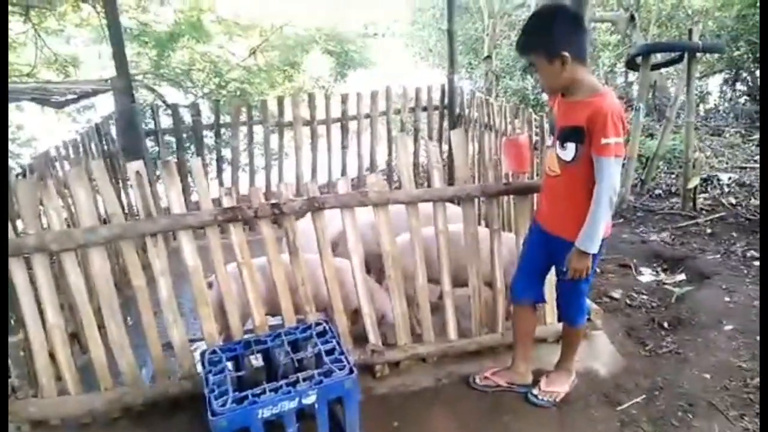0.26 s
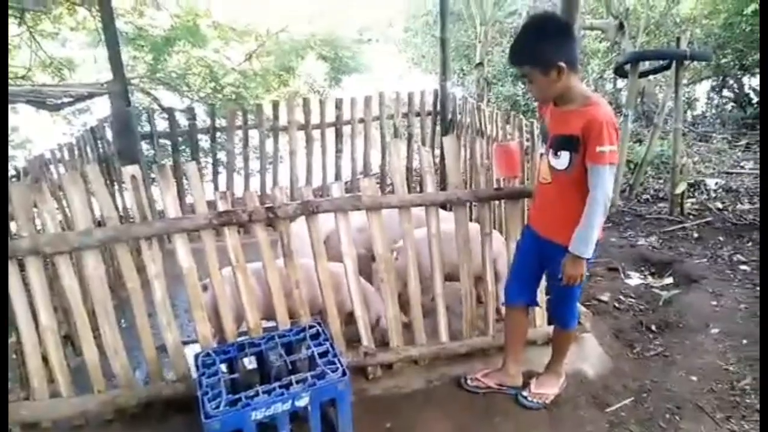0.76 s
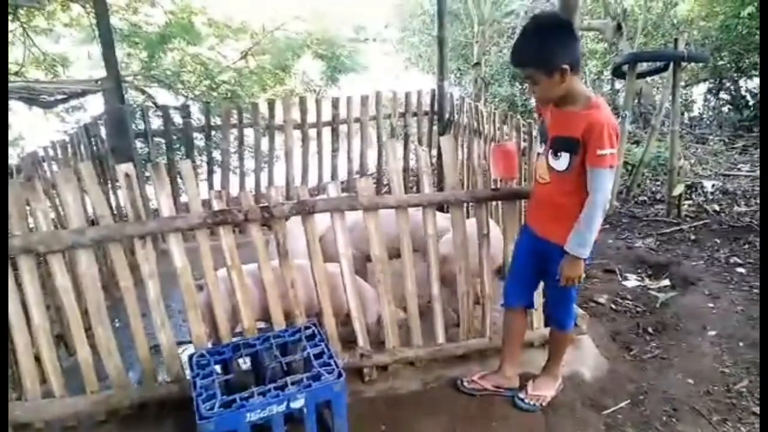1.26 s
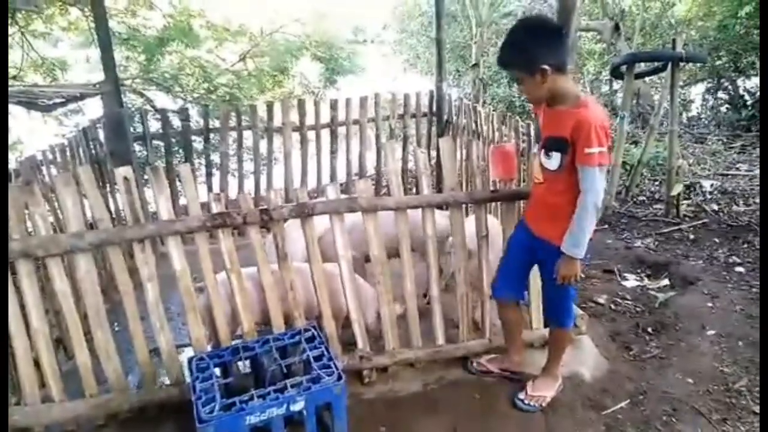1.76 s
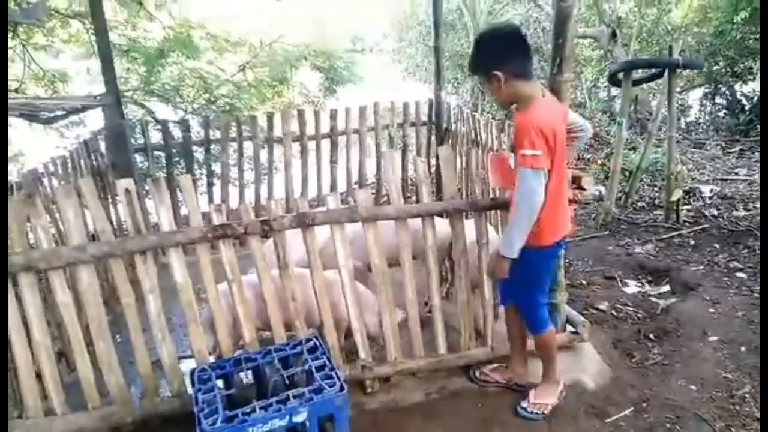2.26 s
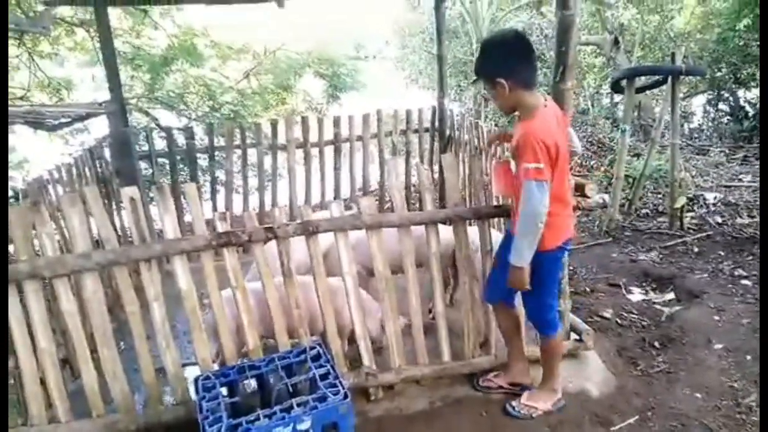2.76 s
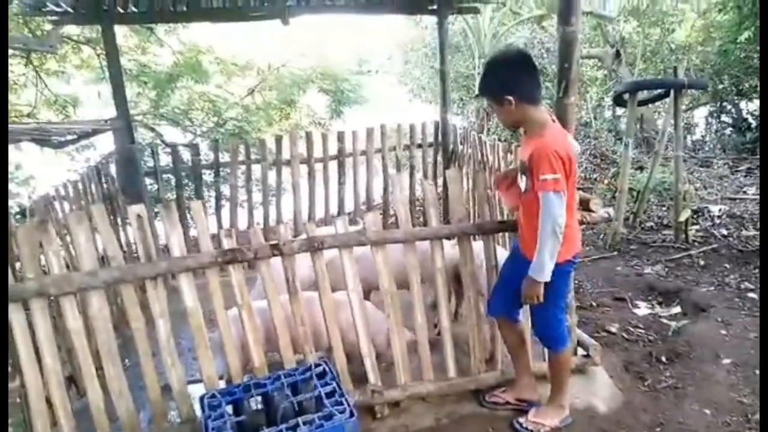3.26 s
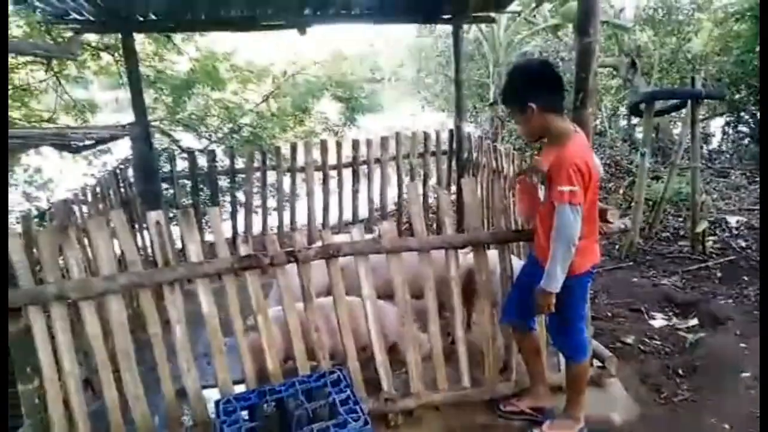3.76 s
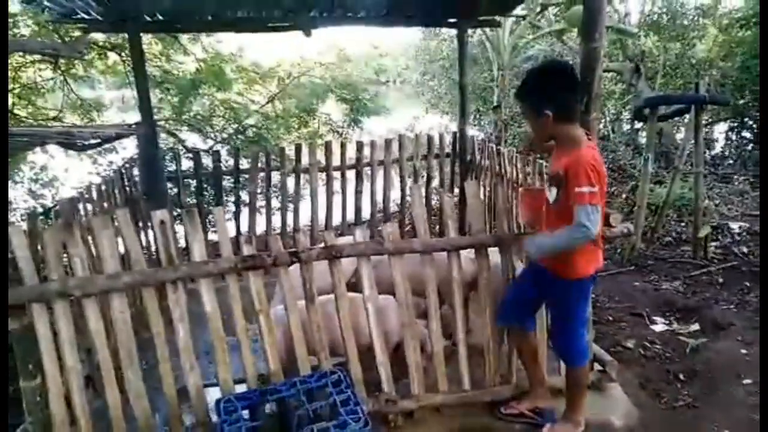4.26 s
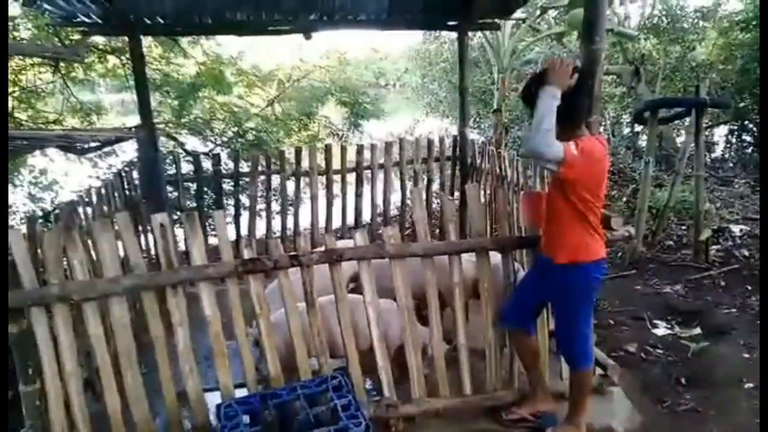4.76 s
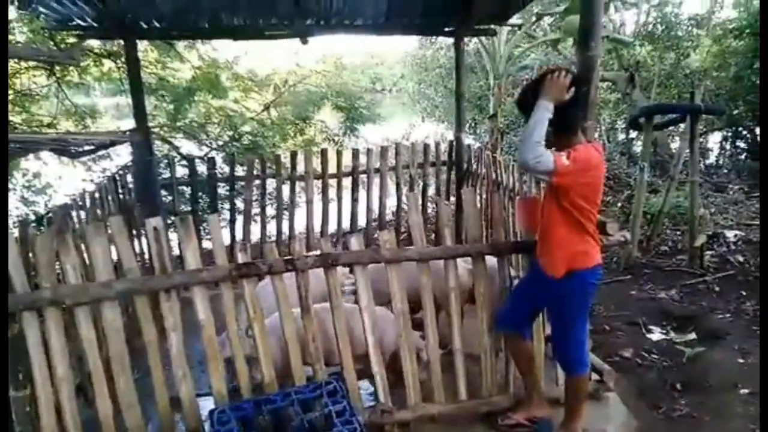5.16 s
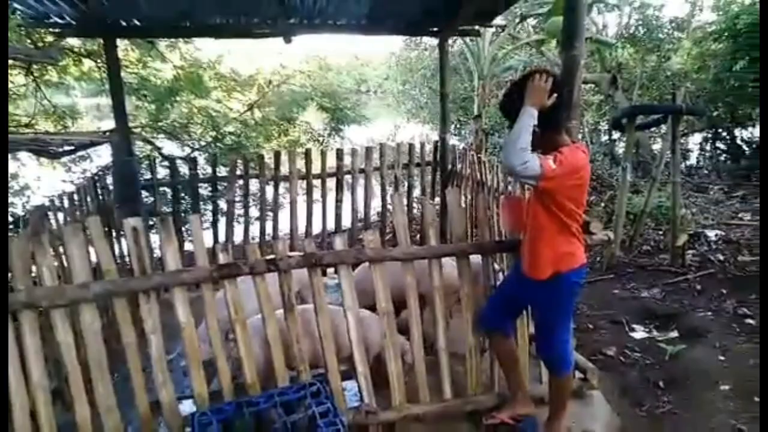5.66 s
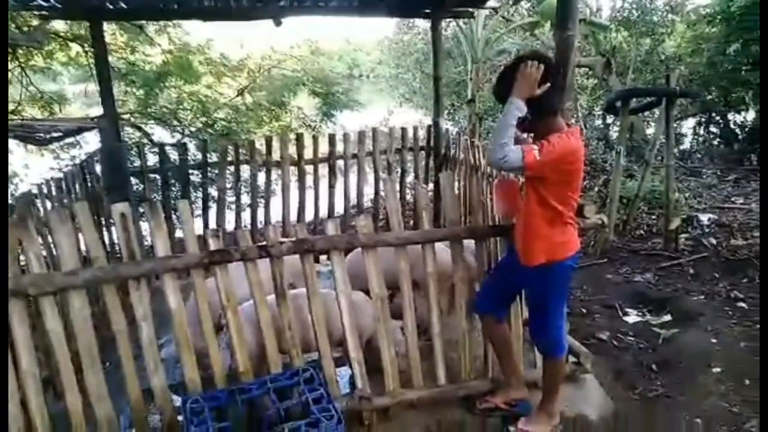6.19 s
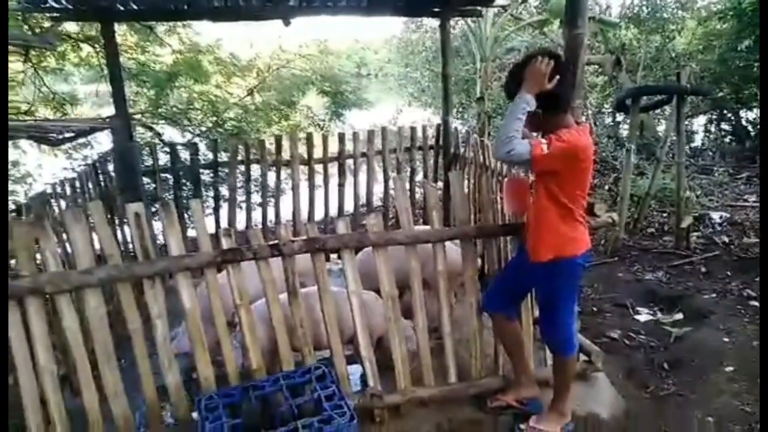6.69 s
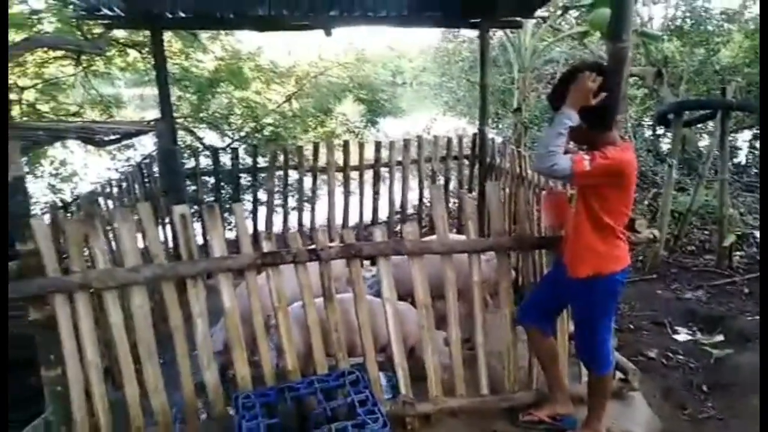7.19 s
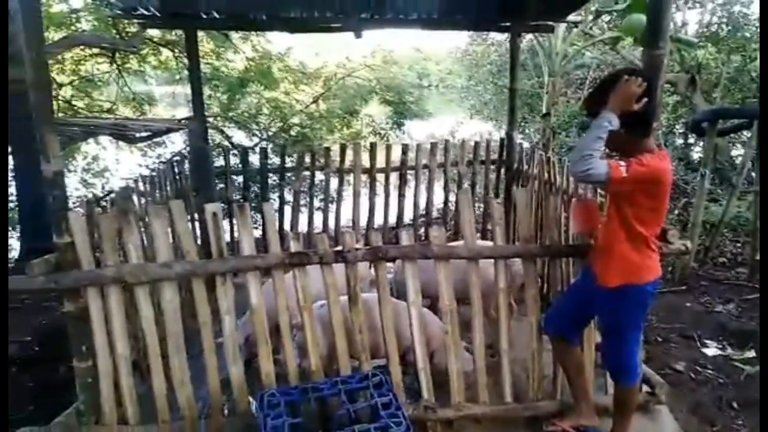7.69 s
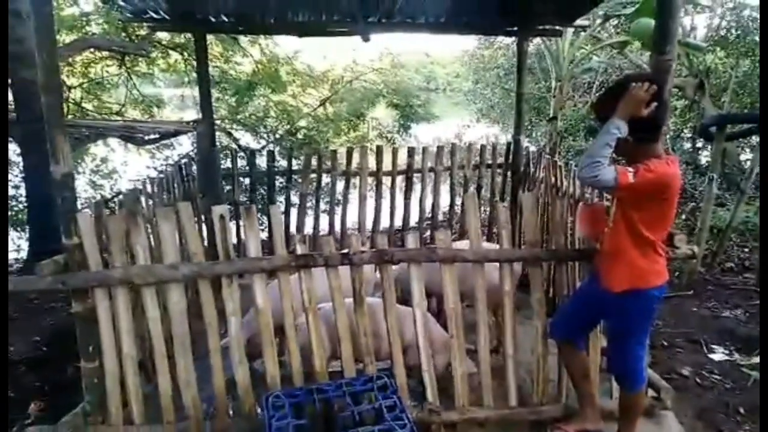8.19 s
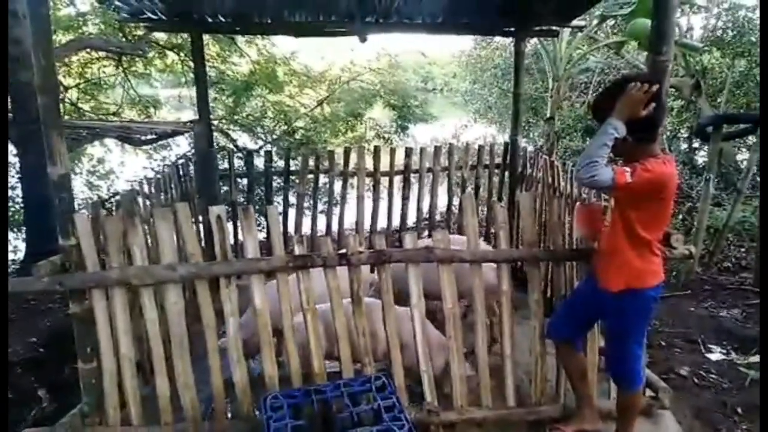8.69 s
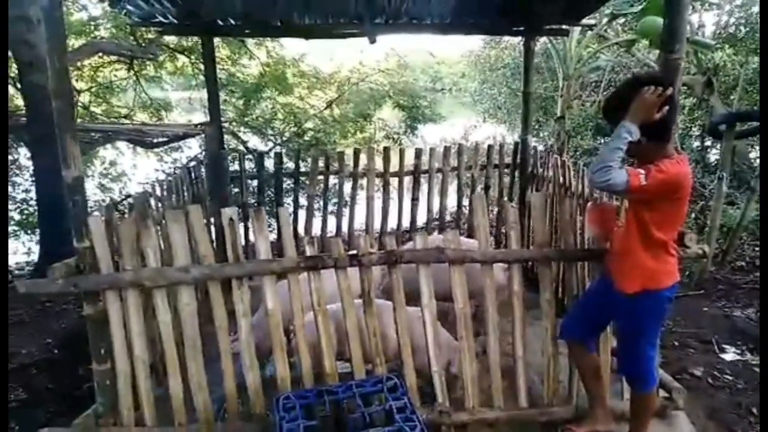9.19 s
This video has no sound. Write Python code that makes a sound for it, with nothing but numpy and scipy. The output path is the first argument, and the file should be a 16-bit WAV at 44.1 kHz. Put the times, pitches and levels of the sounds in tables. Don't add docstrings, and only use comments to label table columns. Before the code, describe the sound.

Pigs snuffle, grunt and smack wetly in a slatted pen while a chick peeps sharply, a rooster crows early and a songbird whistles beyond.

```python
import sys
import numpy as np
from scipy import signal
from scipy.io import wavfile
from scipy.ndimage import uniform_filter1d, map_coordinates

SR = 44100
rng = np.random.default_rng(int(sys.argv[2]) if len(sys.argv) > 2 else 0)


def to_wav(sig):
    pcm = np.clip(np.atleast_2d(sig), -1, 1) * 32767
    pcm = np.round(pcm).astype(np.int16)
    wavfile.write(sys.argv[1], SR, pcm.T)


def nominal_scale(level):
    x = np.asarray(level, float) / 20
    return 10 ** x


N = 416304


def evened(x):
    return x / np.sqrt(np.mean(x ** 2) + 1e-20)


def read(points, hz):
    f, value = np.transpose(points)
    return np.interp(np.log(hz + 1), np.log(f + 1), value)


def columns(rows):
    s, *rest = np.transpose(rows)
    t = np.arange(s[0], s[-1], 1 / SR)
    return s[0], [np.interp(t, s, column) for column in rest]


def add(mix, s, sound):
    part = mix[round(s * SR):][:len(sound)]
    part += sound[:len(part)]


def phase(hz):
    return 2 * np.pi * np.cumsum(hz) / SR


def resonate(x, hz, width_hz):
    turn = np.exp(1j * phase(hz * np.ones(len(x))))
    r = np.exp(-np.pi * width_hz / SR)
    return 2 * (turn * signal.lfilter([1 - r], [1, -r], x / turn)).real


def resonate_twice(x, hz, width_hz):
    return resonate(resonate(x, hz, width_hz), hz, width_hz)


def wander(size, rate_hz):
    span = max(round(SR / rate_hz / 2), 1)
    return evened(uniform_filter1d(uniform_filter1d(rng.standard_normal(size), span), span))


def noise(shape_db, same, patch_db, size=512):
    hz = np.fft.rfftfreq(size, 1 / SR)[:, None]
    s = np.arange(4 * N // size + 5) * size / 4 / SR
    a, b, c, d, patches = rng.standard_normal((len(s), len(hz), 5)).T
    patches = evened(uniform_filter1d(uniform_filter1d(patches, 2, 0), 28, 1))
    left, other = a + 1j * b, c + 1j * d
    z = np.array([left, same * left + np.sqrt(1 - same ** 2) * other])
    z *= nominal_scale(shape_db(hz, s) + patch_db * patches)
    return signal.istft(z, nperseg=size, noverlap=size * 3 // 4)[1][:, :N] / np.sqrt(size / 3)


def place(x, left_lag_ms, wet_db, first_ms):
    # f/Hz, t60/s
    shed = [(300, 0.71), (1500, 0.34), (4000, 0.3), (10000, 0.18)]
    shift = left_lag_ms * SR / 1000 * np.array([[-1], [0]])
    direct = map_coordinates(x, (np.arange(N) + shift)[None], order=0)

    taps = np.zeros((2, SR // 2))
    slots = np.arange(round(first_ms * SR / 1000), SR // 2 - 60, 60)
    at = slots + rng.integers(0, 60, (2, len(slots)))
    np.put_along_axis(taps, at, rng.choice([-1., 1.], at.shape), 1)
    f, t, z = signal.stft(taps, SR, nperseg=256)
    tail = signal.istft(z * nominal_scale(-60 * t / read(shed, f)[:, None]), SR, nperseg=256)[1]
    tail /= np.linalg.norm(tail[0])
    return direct + nominal_scale(wet_db) * signal.fftconvolve(x[None], tail, axes=1)[:, :N]


def road():
    # f/Hz, level/dB per Hz
    rumble_colour = [(12, -32), (20, -15.5), (32, -42.5), (97, 8), (233, -10.5), (304, -22), (398, -24),
                     (468, -76), (586, -34), (700, -40), (910, -100), (1540, -120)]
    # t/s, level/dB
    rumble_level = [(0.0, -44.5), (2.18, -46), (8.28, -44.5), (9.44, -46.5)]
    # t/s, firing rate/Hz, level/dB
    engine_pass = [(5.5, 40.9, -131), (5.95, 40.7, -67), (6.5, 40.95, -60.5), (7.0, 40.63, -65.5),
                   (7.4, 40.67, -74), (7.8, 42.5, -81)]
    # multiple of the firing rate, level/dB
    engine_orders = [(3, -22.5), (4, 7), (5, 7), (6, -8), (7, 0.5), (8, 1), (9, 1), (10, -7), (11, -10.5)]
    s, level_db = np.transpose(rumble_level)
    rumble = evened(noise(lambda hz, t: read(rumble_colour, hz) + 0 * t, same=0.97, patch_db=1.07, size=2048))
    rumble *= nominal_scale(np.interp(np.arange(N) / SR, s, level_db))

    start, (hz, db) = columns(engine_pass)
    turn = phase(hz * (1 + 0.0042 * wander(len(hz), 3.3)))
    hum = 0
    for k, order_db in engine_orders:
        hum = hum + nominal_scale(order_db + 3.6 * wander(len(hz), 14)) * np.sin(k * turn + 6 * rng.random())
    engine = np.zeros(N)
    add(engine, start, nominal_scale(db) * hum)
    return rumble + engine


def leaves_and_insects():
    # f/Hz, level/dB per Hz
    hiss_colour = [(30, -21), (240, 18.5), (400, 2.5), (492, -3.5), (1440, -9.5), (2880, -14), (3430, 3),
                   (5580, -9), (6760, 4.5), (7830, -31.5), (13500, -47)]
    hiss = noise(lambda hz, t: read(hiss_colour, hz) + 0 * t, same=0.014, patch_db=7.5, size=1024)
    return nominal_scale(-60) * evened(hiss)


def whistles(rows, waver, flutter_db, flutter_hz):
    out = np.zeros(N)
    for start, end, from_hz, to_hz, db in rows:
        size = round((end - start) * SR)
        hz = np.linspace(from_hz, to_hz, size) * (1 + waver * wander(size, 170))
        level = nominal_scale(db + flutter_db * wander(size, flutter_hz)) * signal.windows.tukey(size, .35)
        add(out, start, np.sqrt(2) * level * np.sin(phase(hz)))
    return out


def songbird():
    # start t/s, end t/s, first f/Hz, last f/Hz, level/dB
    song = [(3.48, 3.76, 2044, 1979, -59), (2.95, 3.38, 4640, 4460, -63), (3.39, 3.56, 3737, 3773, -56),
            (4.3, 4.5, 4330, 4315, -68), (4.41, 4.79, 4320, 4290, -59.5), (4.97, 5.3, 3960, 3900, -65),
            (5.25, 5.66, 3900, 3870, -60), (3.21, 3.41, 1760, 1730, -70), (4.22, 4.49, 1740, 1660, -68),
            (4.81, 4.98, 1690, 1750, -66), (5.2, 5.62, 1720, 1690, -67), (5.58, 6.2, 3550, 3509, -57.5),
            (7.42, 7.72, 4040, 4000, -65), (7.66, 7.88, 3980, 3910, -61), (7.82, 8.02, 3920, 3890, -69),
            (7.56, 7.8, 5260, 5230, -64), (7.55, 7.8, 5920, 5860, -65)]
    # start t/s, end t/s, first f/Hz, last f/Hz, level/dB
    far_calls = [(4.52, 4.7, 2800, 2600, -69), (5.25, 5.36, 2800, 3200, -65.5),
                 (6.7, 6.86, 2300, 2250, -70), (7.07, 7.22, 5600, 4800, -66.5),
                 (7.44, 7.56, 7500, 6800, -79), (8.9, 9.1, 3200, 3800, -62), (8.02, 8.18, 4080, 3950, -68),
                 (8.17, 8.6, 3560, 3250, -68.5), (8.13, 8.5, 2640, 2400, -67),
                 (8.75, 9.44, 1800, 1860, -69.5), (6.65, 7.0, 3240, 3000, -65),
                 (4.33, 4.52, 2760, 2720, -87.5), (8.02, 8.16, 6100, 6100, -67.5),
                 (7.97, 8.15, 5200, 3500, -80), (6.62, 7.0, 3650, 3200, -69),
                 (6.9, 7.01, 1020, 1000, -75.5)]
    clear = whistles(song, waver=0.0069, flutter_db=2.5, flutter_hz=35)
    return clear + whistles(far_calls, waver=0.0236, flutter_db=5, flutter_hz=90)


def rooster():
    # t/s, f/Hz, effort/dB, hoarseness/0-1
    syllables = [
        [(.38, 628, -55, 0.46), (.47, 698, -52.5, 0.23), (.6, 687, -63, 0.42), (.95, 690, -66, .4)],
        [(.44, 787, -50.5, 0.06), (.55, 774.7, -50.5, 0.22), (.66, 796, -43.5, 0.31), (.78, 781, -57, 0.23)],
        [(.6, 829.4, -50, 0.02), (.7, 834, -47, 0.01), (.8, 856, -52.5, 0.54)],
        [(.83, 813, -38, 0.56), (.9, 819, -51, 0.43), (1.0, 802.6, -46.5, 0.22), (1.2, 807.7, -45.5, 0.55),
         (1.58, 766.6, -66, 0.95)],
        [(1.57, 661.5, -47.5, 0.15), (1.72, 649.6, -51, 0), (1.87, 628.7, -59.5, 0.07),
         (2.15, 580.6, -63.5, 0.7), (2.4, 557, -81.5, 0.4)],
        [(3.45, 1004, -63.5, 0.64), (4.02, 948, -67.5, 1)],
        [(9.0, 577.5, -67.5, 0.6), (9.44, 550, -68, 0.85)],
    ]
    # f/Hz, gain/dB
    crow_throat = [(600, -12), (820, -16.5), (1300, -7.5), (1650, -11), (2050, -16), (2500, -30),
                   (3300, -49)]
    out = np.zeros(N)
    for rows in syllables:
        s, (hz, db, hoarse) = columns(rows)
        size = len(hz)
        turn = phase(hz * (1 + (.003 + .032 * hoarse) * wander(size, 97)))
        stack = sum(nominal_scale(read(crow_throat, k * hz)) * np.sin(k * turn) for k in range(1, 5))
        rattle = np.cos(phase(120 * (1 + 0.261 * wander(size, 39)))) + 0.055 * wander(size, 250)
        swell = nominal_scale(db + 2.5 * wander(size, 45)) * signal.windows.tukey(size, .08)
        add(out, s, np.sqrt(2) * swell * stack * (1 + hoarse * rattle))
    return out


def peeps():
    # t/s, f/Hz, level/dB
    long_notes = [
        [(0.144, 4850, -46), (0.161, 4800, -36), (0.178, 4565, -46.5), (0.195, 3811, -49), (0.211, 3617, -36.5),
         (0.227, 3359, -53), (0.244, 2720, -36.5), (0.261, 2200, -40.5)],
        [(1.006, 4360, -36), (1.025, 4550, -32.5), (1.044, 4290, -41), (1.063, 4120, -42), (1.083, 3476, -31),
         (1.101, 3300, -32), (1.12, 2940, -50.5), (1.139, 2250, -30)],
        [(1.29, 4730, -39), (1.308, 4580, -46), (1.327, 4177, -47), (1.345, 3811, -43), (1.363, 3509, -32.5),
         (1.381, 3186, -36), (1.4, 2734, -44), (1.418, 2176, -33.5)],
        [(2.303, 4570, -73), (2.321, 4026, -30), (2.339, 3790, -34.5), (2.357, 3445, -39), (2.376, 3273, -34.5),
         (2.394, 3143, -46), (2.412, 2876, -37), (2.429, 2740, -45)],
        [(2.508, 4680, -55), (2.528, 4620, -52), (2.547, 4410, -74), (2.567, 3610, -36), (2.586, 3466, -35.5),
         (2.606, 2885, -49), (2.625, 2583, -34), (2.645, 2340, -37)],
        [(3.591, 4888, -50), (3.613, 4737, -49), (3.635, 3983, -47), (3.657, 3805, -39), (3.679, 3470, -46),
         (3.701, 3030, -32.5), (3.723, 2840, -40.5), (3.744, 2570, -41)],
        [(3.872, 4880, -53), (3.891, 4371, -43), (3.91, 4130, -40), (3.929, 3840, -40), (3.948, 3520, -35.5),
         (3.967, 3270, -30), (3.986, 2880, -37), (4.005, 2460, -42)],
        [(4.838, 4608, -39.5), (4.857, 4590, -45.5), (4.876, 4091, -44.5), (4.895, 3746, -38),
         (4.913, 3596, -32.5), (4.932, 3445, -36.5), (4.951, 2971, -45), (4.97, 2420, -31)],
        [(7.292, 4457, -27.5), (7.306, 4198, -52), (7.32, 3710, -33), (7.334, 3623, -43.5), (7.347, 3390, -42),
         (7.361, 2970, -48), (7.375, 2710, -56), (7.389, 2450, -39)],
        [(7.478, 4610, -44), (7.491, 4478, -48), (7.504, 4134, -40), (7.517, 3983, -42), (7.531, 3580, -30.5),
         (7.544, 3390, -43), (7.557, 3130, -40.5), (7.57, 2800, -57)],]
    # start t/s, length t/s, first f/Hz, last f/Hz, level/dB
    short_notes = [(0.031, 0.028, 2880, 2656, -38), (0.403, 0.052, 4020, 3620, -50),
                   (0.449, 0.053, 3580, 2900, -55.5), (0.602, 0.061, 4260, 3870, -55.5),
                   (0.649, 0.059, 3740, 3090, -49.5), (0.786, .062, 4336, 3375, -48.5),
                   (0.993, 0.015, 3400, 3520, -39), (1.163, 0.055, 4260, 3360, -49),
                   (1.676, 0.029, 3600, 2740, -47), (2.304, .018, 4750, 4380, -52),
                   (2.51, 0.053, 4740, 4380, -50), (1.65, 0.025, 3900, 3920, -43.5),
                   (2.288, 0.012, 3790, 4640, -53), (3.519, 0.071, 2930, 2490, -52.5),
                   (4.825, 0.015, 2960, 4350, -45), (6.276, 0.033, 2880, 2090, -39),
                   (6.319, 0.022, 2200, 3610, -41), (6.466, 0.035, 3710, 2520, -35.5),
                   (7.265, 0.013, 2880, 4000, -47.5), (7.46, .01, 3500, 4100, -42),
                   (8.81, 0.077, 4310, 3805, -54)]
    short = [[(s, from_hz, db), (s + length, to_hz, db)] for s, length, from_hz, to_hz, db in short_notes]
    out = np.zeros(N)
    for rows in long_notes + short:
        s, (hz, db) = columns(rows)
        turn = phase(hz * (1 + .012 * wander(len(hz), 130)))
        level = nominal_scale(db + 2.2 * wander(len(hz), 150)) * signal.windows.tukey(len(hz), .1)
        add(out, s, level * (np.sin(turn) + nominal_scale(-33) * np.sin(2 * turn)))
    return out


def snaps():
    # t/s, peak level/dB, centre f/Hz
    snap_hits = [
        (1.8255, -33, 4800),
        (2.1262, -37, 2300),
        (2.1263, -41, 6000),
        (2.2203, -32, 7500),
        (2.682, -40, 5000),
        (3.81, -42, 7000),
        (5.7325, -33, 4500),
    ]
    out, click = np.zeros(N), signal.unit_impulse(441)
    for s, db, hz in snap_hits:
        ring = resonate_twice(click, hz, 2500)
        add(out, s, nominal_scale(db) * ring / abs(ring).max())
    return out


def knocks():
    # t/s, peak level/dB, ring f/Hz, t60/s
    trough_hits = [
        (2.6812, -40.5, 1254, 0.016),
        (6.234, -48.5, 1293, 0.31),
        (7.285, -53, 1090, 0.092),
        (8.241, -46, 1490, 0.11),
        (8.562, -41, 1580, 0.11),
        (9.3068, -35.5, 1300, 0.033),
    ]
    out, t = np.zeros(N), np.arange(8820) / SR
    for s, db, hz, t60 in trough_hits:
        blow = rng.standard_normal(8820) * nominal_scale(-60 * t / t60) * np.minimum(t / 0.0013, 1)
        ring = resonate_twice(blow, hz, 320) + 0.5 * resonate_twice(blow, 1.44 * hz, 500)
        add(out, s - .001, nominal_scale(db) * ring / abs(ring).max())
    return out


def rooting():
    # start t/s, length t/s, airflow level/dB, brightness level/dB, nostril depth level/dB
    snuffles = [(0.0, 0.089, -58, -8, -8.5), (0.183, 0.078, -60, -17.5, -21), (0.376, 0.11, -73, -2, -16),
                (0.475, 1, -62, -37.5, 6), (0.84, 0.69, -62.5, -18.5, 9), (1.3, 0.69, -59.5, -17.5, 4.5),
                (1.543, 0.12, -59.5, 18.5, 9), (1.798, 0.23, -52.5, -4.5, -39), (2.248, 0.54, -61, -2, -30),
                (2.401, 0.13, -55, 20.5, -30), (2.44, 0.17, -51.5, -20, -27), (2.661, 0.1, -53, -24, -13),
                (3.052, 0.12, -57, -10.5, -7), (3.429, 0.16, -59.5, -61, 0), (3.8, 0.43, -60.5, -16, -13),
                (4.03, 0.21, -56.5, -18, -1.5), (4.533, 0.58, -63.5, -59, -39),
                (4.888, 0.14, -57.5, -3.5, -17), (5.722, 0.1, -54.5, -13, -8),
                (5.909, 0.11, -59.5, -33, -9), (6.43, 0.18, -59.5, -14, -13.5),
                (4.735, 0.065, -55.5, -53, -17.5), (7.519, 0.12, -54.5, -2.5, -41),
                (8.37, 0.31, -72.5, -11, -3), (8.55, 0.17, -54.5, -54, -5),
                (8.915, 0.42, -63.5, -39, -11.5), (9.253, 0.22, -61.5, -47, -3)]
    # f/Hz, level/dB per Hz
    snout = [(590, -108), (1000, -3), (1200, -5), (1650, -1.5), (4300, -2.5), (12500, -13.5), (13500, -29)]
    rise_s, fade_db, shut_s = 0.014, -11, 0.091
    rest_db, rest_bright_db, rest_depth_db = -75.5, -9.5, -11.5
    mouth_db, spatter_db, spatter_hz = 0.5, 3, 14.6
    s, length, flow_db, bright_db, depth_db = np.transpose(snuffles)[:, :, None]

    def shape_db(hz, t):
        def weight(centre_hz, octaves):
            return np.exp(-.5 * (np.log2((hz + 1) / centre_hz) / octaves) ** 2)

        def colour(bright, depth):
            return nominal_scale(2 * (weight(11180, 0.27) * bright + weight(1384, 0.34) * depth))

        gate = np.clip((t - s) / rise_s, 0, 1) * np.clip((s + length - t) / shut_s + 1, 0, 1)
        flow = (gate * nominal_scale(flow_db + fade_db * np.clip((t - s) / length, 0, 2))) ** 2
        power = colour(bright_db.T, depth_db.T) @ flow
        power = power + colour(rest_bright_db, rest_depth_db) * nominal_scale(2 * rest_db)
        spatter = weight(8600, 1) * spatter_db * wander(len(t), spatter_hz * SR * t[1])
        mouth = weight(6900, 0.55) * mouth_db
        return read(snout, hz) + spatter + mouth + 10 * np.log10(power) + 14.5

    return noise(shape_db, same=.1, patch_db=6.5) * nominal_scale(2 * wander(N, 40))


def smacks():
    # t/s, peak level/dB, low body level/dB, splash t60/s
    wet_smacks = [(0.693, -40, -0.5, 0.2), (1.1603, -37.5, 0, 0.21), (1.821, -25.5, -1, 0.009),
                  (2.1237, -38.5, 1, 0.057), (2.967, -64, 21.5, 0.14), (3.0713, -53, 9, 0.037),
                  (4.053, -45, 5, 0.088), (4.9823, -39, 6, 0.26), (5.7309, -35.5, -3, 0.052),
                  (5.9292, -46.5, 1, 0.16), (6.119, -51, 2, 0.94), (6.227, -40, -0.5, 0.16),
                  (7.283, -46, 4, 0.12), (7.523, -52, 1, 0.032), (8.5464, -30.5, -19, 0.22),
                  (9.2546, -41, -16, 0.17)]
    # t/s, peak level/dB, splash t60/s
    thin_ticks = [(.199, -42.5, 0.24), (0.374, -53, 0.11), (0.482, -46, 0.57), (0.848, -54, .15),
                  (2.4492, -38, 0.039), (2.6833, -45, 0.084), (4.362, -55, 0.075), (4.546, -68, 0.13),
                  (4.732, -56, 0.082), (6.452, -41, 0.17), (7.5335, -39.5, 0.098), (8.8, -55, 0.13),
                  (8.943, -60, 0.09), (8.971, -58, 0.092), (9.098, -41.5, 0.087), (1.807, -40, 0.1),
                  (2.2205, -43, 0.025), (3.364, -41, 0.16), (3.6347, -36, 0.23), (3.8078, -62, 0.076),
                  (4.203, -32.5, 0.21), (5.179, -39, 0.22), (5.338, -42.5, 0.087), (5.442, -40, 0.25),
                  (6.5503, -40.5, 0.09), (7.047, -50.5, 0.32), (7.8345, -43.5, 0.42), (8.1811, -40.5, 0.48),
                  (8.339, -43.5, 0.17), (9.411, -31, 0.3)]
    tick_body_db = -27
    out, t = np.zeros(N), np.arange(8820) / SR
    for s, db, body_db, t60 in wet_smacks + [(s, db, tick_body_db, t60) for s, db, t60 in thin_ticks]:
        drops = nominal_scale(2.45 * np.minimum(rng.exponential(1, 8820), 4)) * rng.standard_normal(8820)
        drops *= rng.random(8820) < .12
        decay = nominal_scale(-60 * t / 0.017) + 0.14 * nominal_scale(-60 * t / max(t60, .01))
        splash = evened(drops) * decay * np.minimum(t / 0.0072, 1)
        tick = resonate(resonate(splash, 7170, 4500), 7400, 4200) + 0.92 * resonate(splash, 4600, 1100)
        pop = resonate_twice(splash, 2510, 1500)
        add(out, s - .001, nominal_scale(db) * (tick / abs(tick).max() + nominal_scale(body_db) * pop / abs(pop).max()))
    return out


def gulps():
    # t/s, peak level/dB, first f/Hz, last f/Hz, length t/s
    swallows = [(3.069, -36, 522, 562, 0.022), (3.098, -40, 193, 170, 0.021), (3.069, -49, 703, 690, 0.05),
                (3.099, -62, 553, 520, 0.0093), (4.046, -49.5, 415, 603, 0.0456),
                (4.047, -50, 866, 875, 0.025), (4.068, -45.5, 665, 1100, 0.03),
                (4.276, -45, 605, 656, 0.017), (4.293, -51, 640, 645, 0.011), (4.984, -46, 510, 534, 0.022),
                (5.006, -48.5, 675, 766, 0.022), (5.126, -50.5, 483, 624, 0.025),
                (5.144, -54, 760, 780, 0.032), (5.86, -50, 440, 454, 0.02), (5.878, -51, 778, 773, 0.031)]
    throb_depth, throb_hz = 0.52, 123
    out = np.zeros(N)
    for s, db, from_hz, to_hz, length in swallows:
        u = np.arange(0, length, 1 / SR) / length
        tone = np.sin(phase(from_hz + (to_hz - from_hz) * u))
        throb = 1 + throb_depth * np.cos(2 * np.pi * throb_hz * (u * length - .004))
        level = nominal_scale(db + 3.1 * wander(len(u), 200)) * np.sin(np.pi * u ** 0.79)
        add(out, s, throb * level * tone)
    return out


def grunts():
    # t/s, peak level/dB, throat f/Hz, length t/s, rise t/s
    grunt_calls = [(0.039, -58, 640, 0.37, 0.0096), (2.919, -48.5, 477, 0.24, 0.053),
                   (3.072, -51, 467, 0.027, 0.0049), (3.148, -46, 553, 0.018, 0.008),
                   (3.443, -54.5, 537, 0.31, 0.0076), (3.595, -46.5, 464, 0.045, 0.0071),
                   (4.054, -39, 490, 0.038, 0.014), (4.316, -55, 547, 0.15, 0.021),
                   (4.521, -54, 563, 0.19, 0.017), (4.963, -45, 520, 0.055, 0.018),
                   (4.998, -38.5, 763, 0.026, 0.03), (5.122, -42, 590, 0.046, 0.022),
                   (5.301, -53.5, 580, 0.11, 0.0053), (5.77, -52, 495, 0.024, 0.015),
                   (5.856, -44, 455, 0.048, 0.031), (8.001, -59.5, 656, 0.035, 0.11)]
    upper_throat_db, close_power = -30, 2.6
    out, t = np.zeros(N), np.arange(11025) / SR
    muffle = signal.butter(4, 820, fs=SR, output="sos")
    for s, db, hz, length, rise in grunt_calls:
        turns = np.cumsum(125 * (1 + 0.189 * wander(11025, 80))) / SR
        pulses = np.diff(np.floor(turns + 0.646), prepend=0)
        breath = 0.075 * rng.standard_normal(11025)
        effort = np.minimum(t / rise, 1) * np.exp(-(t / length) ** close_power)
        drive = (pulses + breath) * effort
        drive = drive - uniform_filter1d(drive, size=150)

        throat_hz = hz * (1 + 0.027 * np.minimum(t / length, 1))
        low = resonate(drive, throat_hz, 160) + .5 * resonate(drive, 1.3 * throat_hz, 130)
        low = signal.sosfilt(muffle, resonate(low, 1.1 * throat_hz, 300))
        upper = resonate_twice(drive, 3200, 1000)
        add(out, s, nominal_scale(db) * (low / abs(low).max() + nominal_scale(upper_throat_db) * upper / abs(upper).max()))
    return out


def scene():
    # t/s, left lag/ms
    chick_side = [(0.2, -0.094), (.9, 0.054), (1.4, 0.079), (2.3, 0.2), (2.6, 0.27), (3.6, 0.24),
                  (4.9, 0.26), (7.3, 0.32)]
    background = road() + leaves_and_insects()
    bird = place(songbird(), -0.2, wet_db=-3.5, first_ms=5.5)
    cock = place(rooster() * nominal_scale(8), -0.42, wet_db=-5, first_ms=6.8)
    chick_lag_ms = np.interp(np.arange(N) / SR, *np.transpose(chick_side))
    chicks = place(peeps(), chick_lag_ms, wet_db=-8.5, first_ms=1.712)
    mouths = place(smacks() + knocks(), 0.03, wet_db=-4.5, first_ms=1.9)
    throats = place(grunts() + gulps(), 0.26, wet_db=-11, first_ms=7.26)
    return background + bird + cock + chicks + snaps() + rooting() + mouths + throats


def band_limit(x):
    return signal.sosfilt(signal.butter(12, 13830, fs=SR, output="sos"), x)


def record(dry):
    # f/Hz, left minus right level/dB
    ports = [(300, -0.5), (1500, -0.5), (4500, 3), (7500, 8), (10000, -9), (11500, -11.5), (13000, -13.5)]
    edge_hz, gate_depth_db = 13300, -28
    near_reach_db, wide_reach_db = -9, -13
    hz, _, z = signal.stft(dry, SR, nperseg=1024, noverlap=768)
    hz = hz[:, None]
    z = z * nominal_scale(read(ports, hz) / 2 * np.array([1, -1])[:, None, None]) * (hz < edge_hz)

    def decibels(power):
        return 10 * np.log10(abs(power) + 1e-16)

    power = uniform_filter1d((abs(z) ** 2).mean(0), size=11, axis=1)
    power_db = decibels(power)
    near = uniform_filter1d(uniform_filter1d(power, size=15, axis=0), size=40, axis=1)
    near_db = decibels(near) + near_reach_db
    wide_db = decibels(uniform_filter1d(power, size=70, axis=0)) + wide_reach_db * (1 + 4 * (hz < 2500))
    usual_db = np.percentile(power_db[:, ::2], 22, axis=1)[:, None]
    threshold_db = np.maximum(np.maximum(usual_db, wide_db), near_db)

    over_db = uniform_filter1d(power_db - threshold_db, size=2, axis=0)
    over_db = over_db - 0.86 * np.clip((hz - 7000) / 2000, 0, 1)
    shut = np.clip(-over_db / 3, 0, 1) * np.clip((hz - 500) / 400, 0, 1)
    z = z * nominal_scale(gate_depth_db * uniform_filter1d(shut, size=2, axis=1))
    mix = signal.istft(z, SR, nperseg=1024, noverlap=768)[1][:, :N]
    return band_limit(mix)


dry = scene()
out = record(dry)
to_wav(out)
```